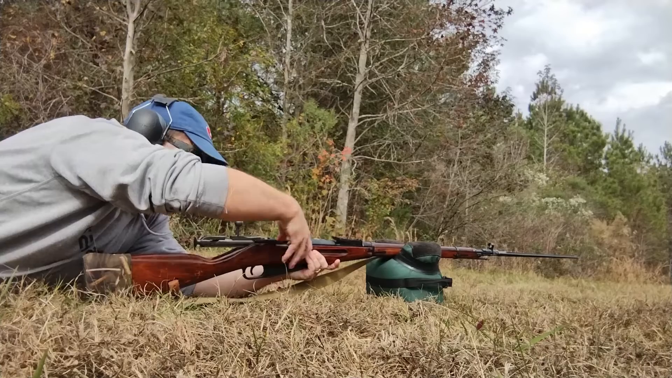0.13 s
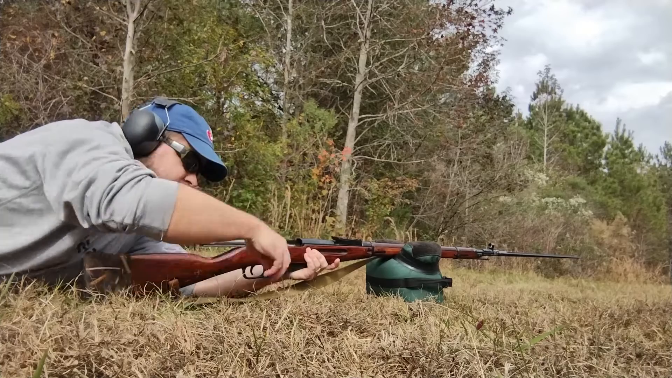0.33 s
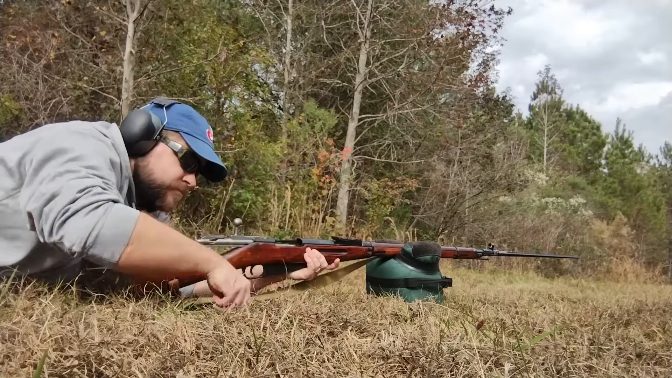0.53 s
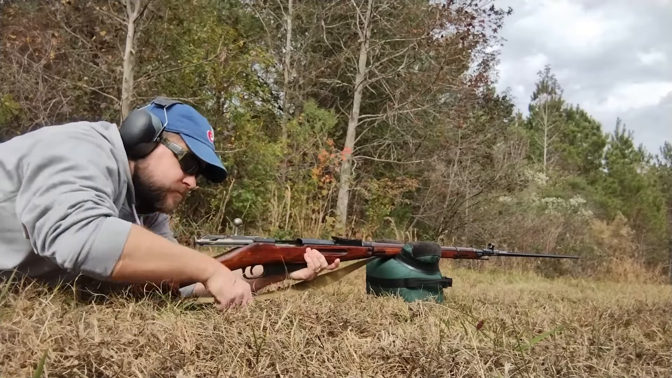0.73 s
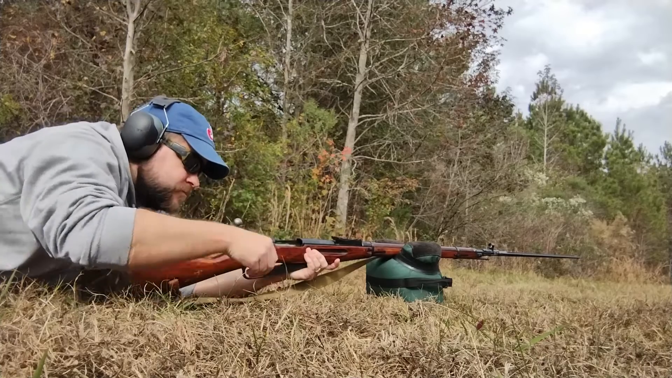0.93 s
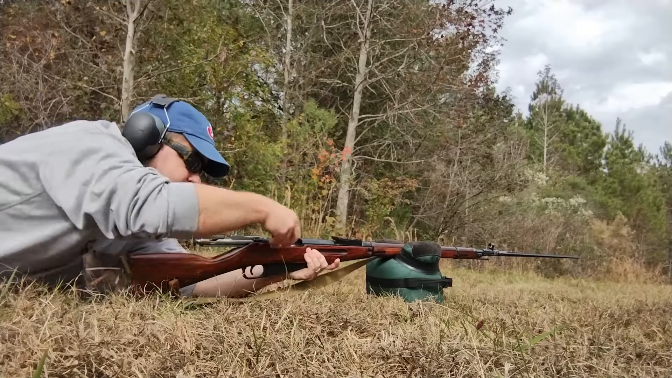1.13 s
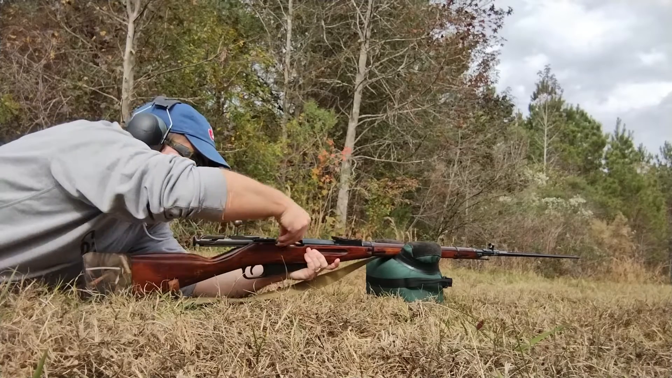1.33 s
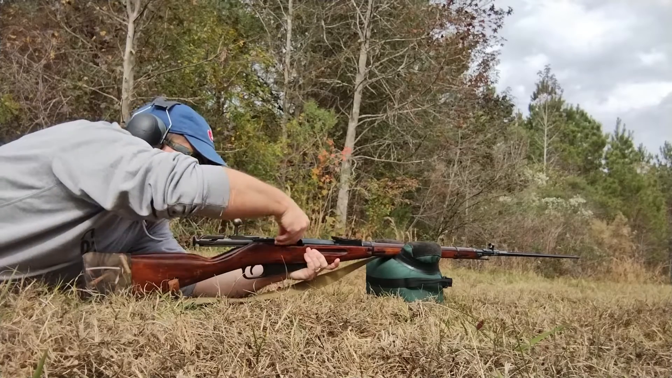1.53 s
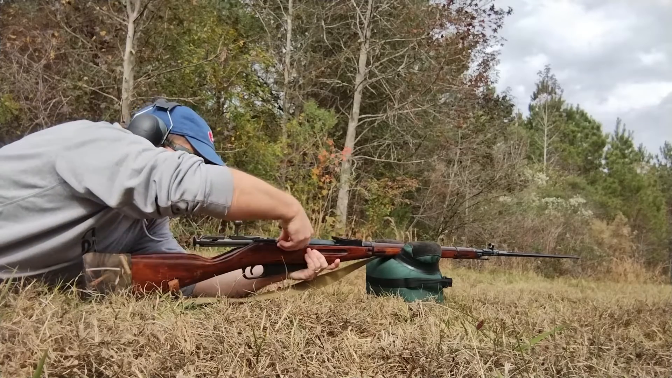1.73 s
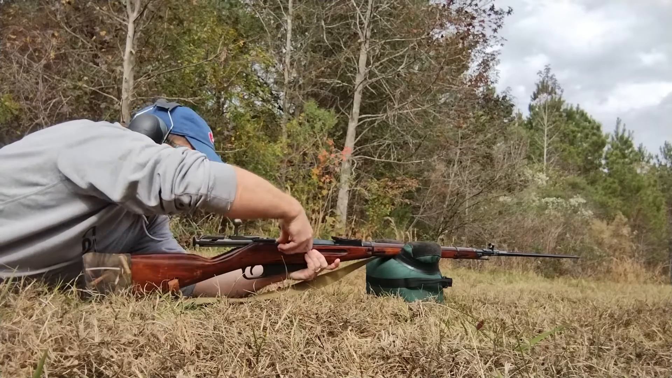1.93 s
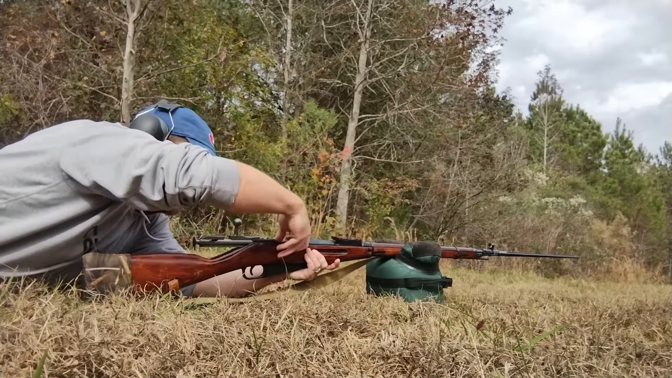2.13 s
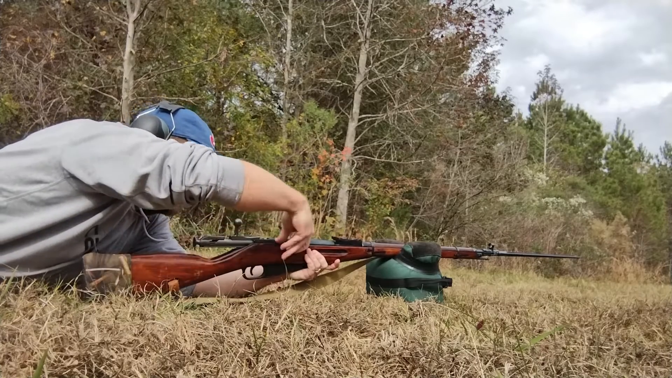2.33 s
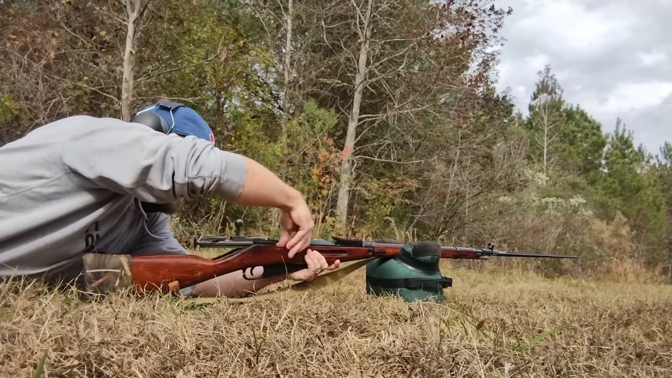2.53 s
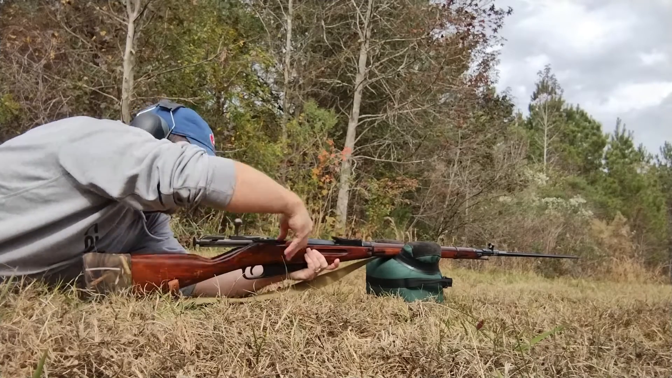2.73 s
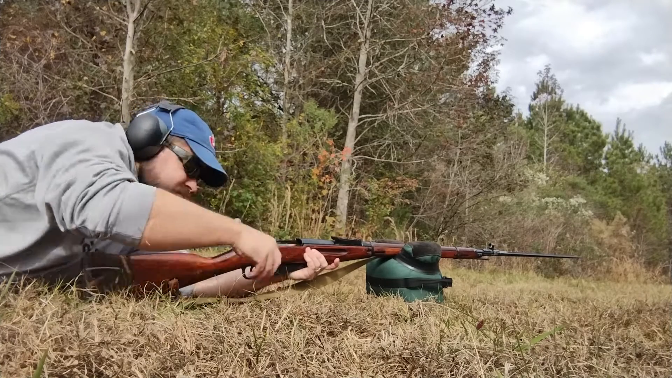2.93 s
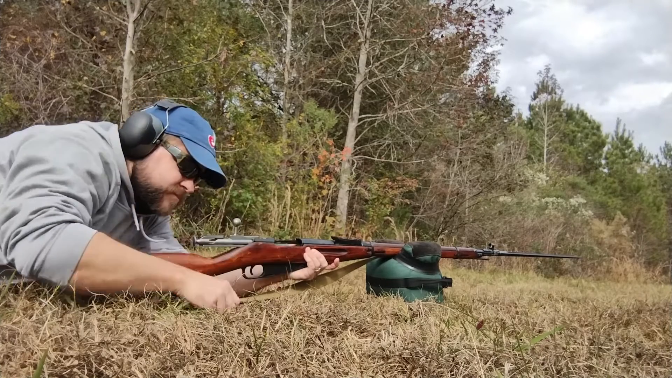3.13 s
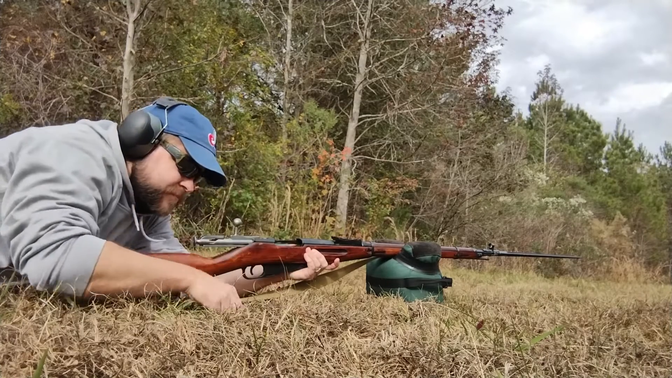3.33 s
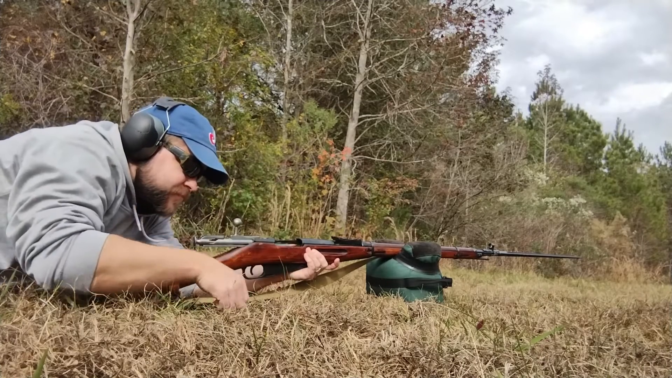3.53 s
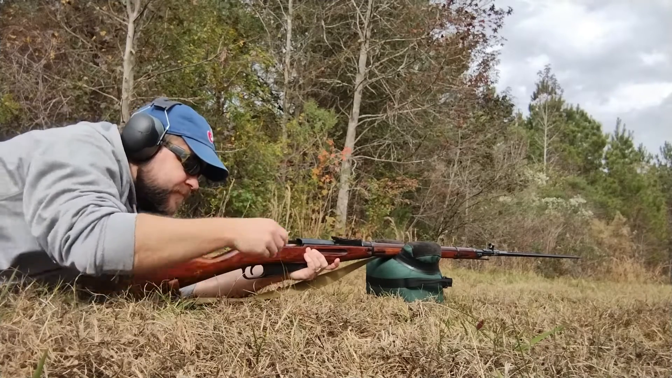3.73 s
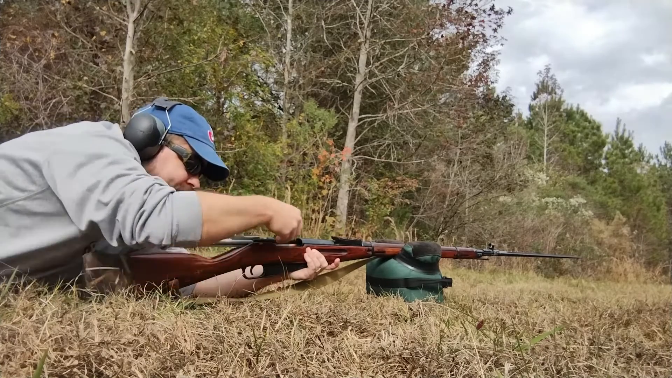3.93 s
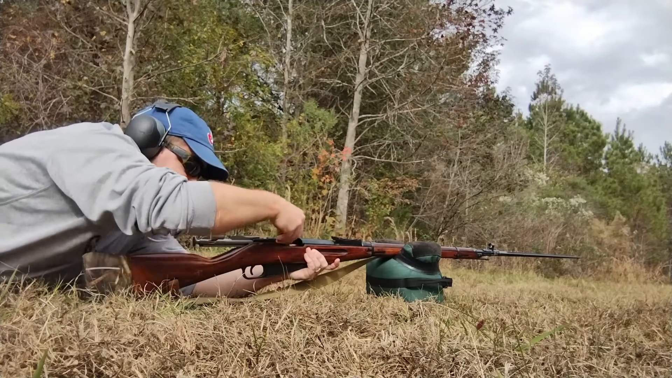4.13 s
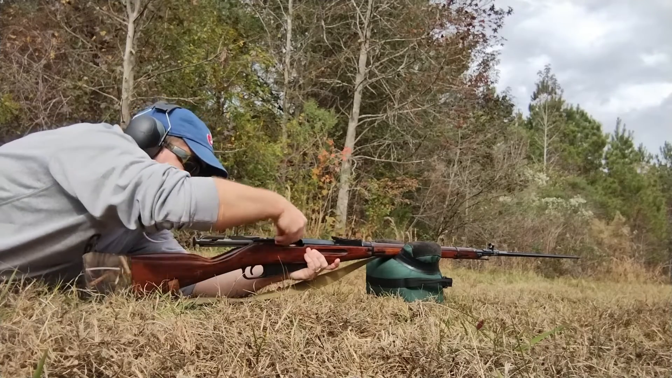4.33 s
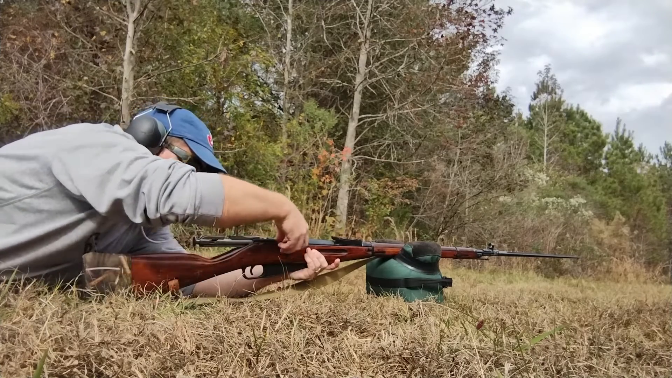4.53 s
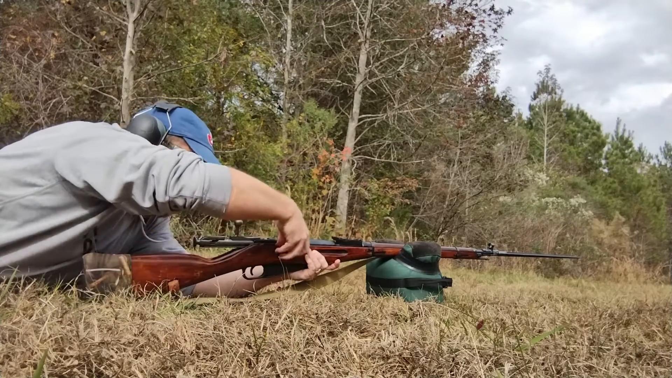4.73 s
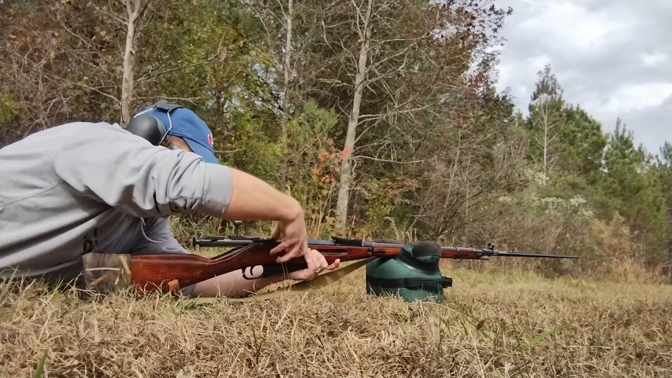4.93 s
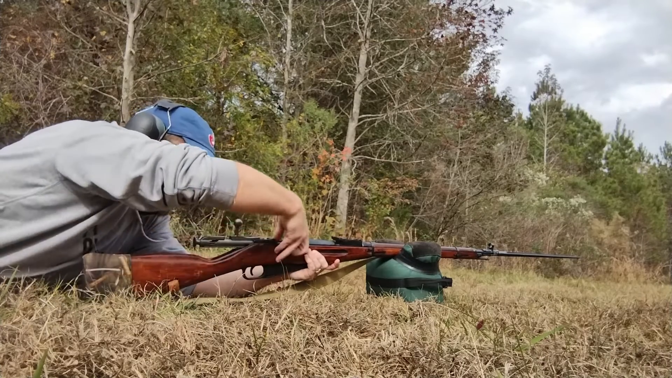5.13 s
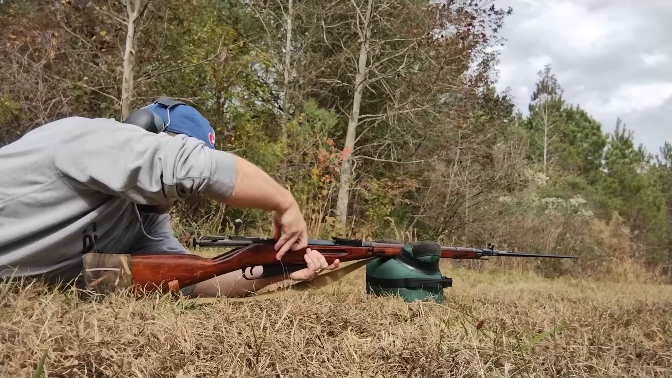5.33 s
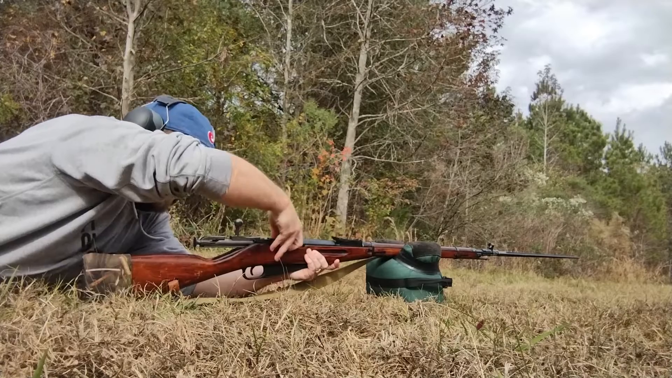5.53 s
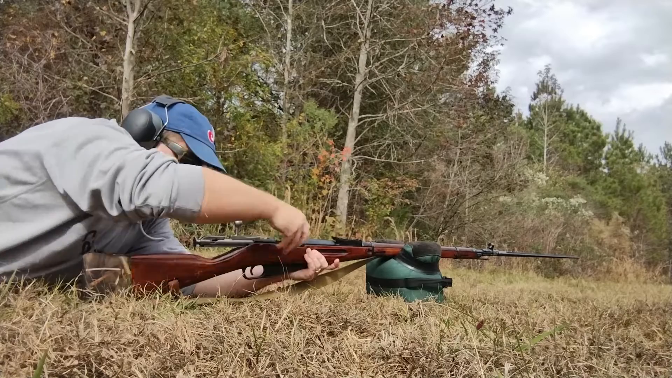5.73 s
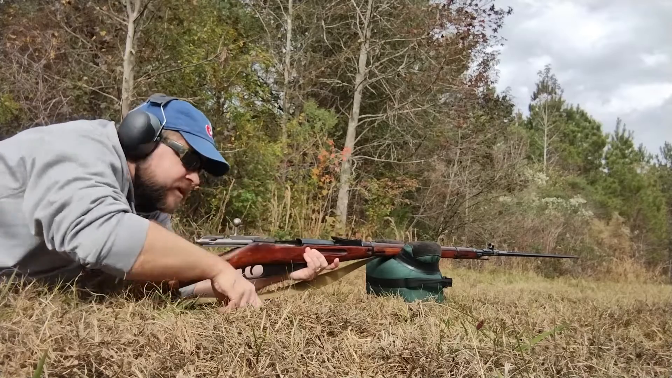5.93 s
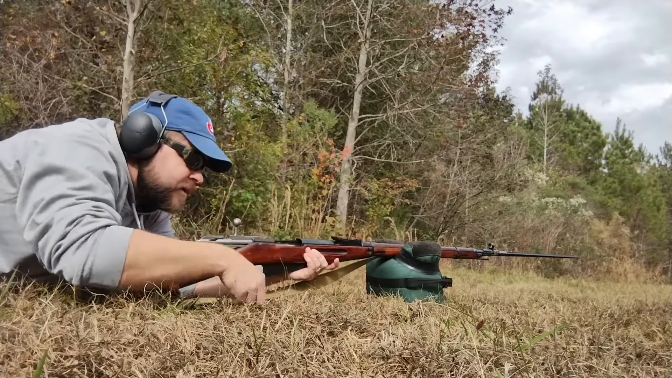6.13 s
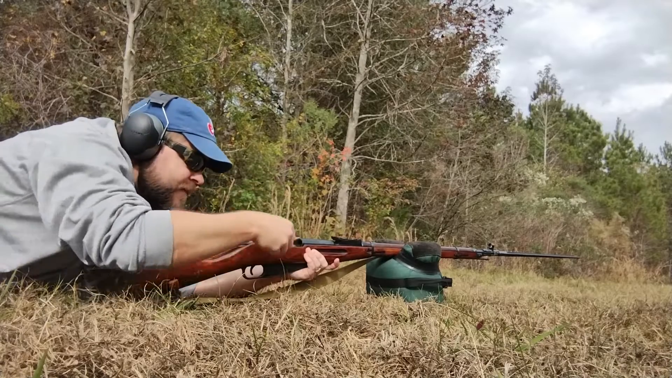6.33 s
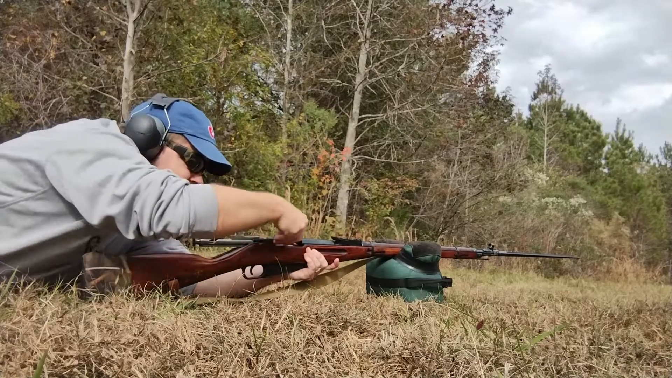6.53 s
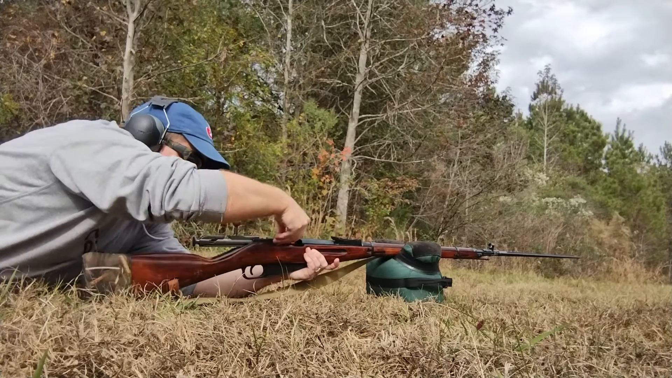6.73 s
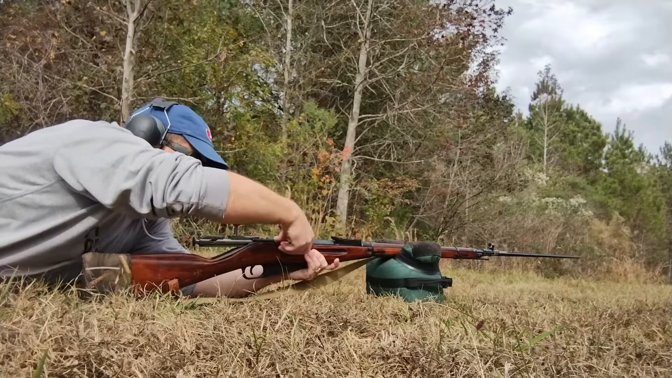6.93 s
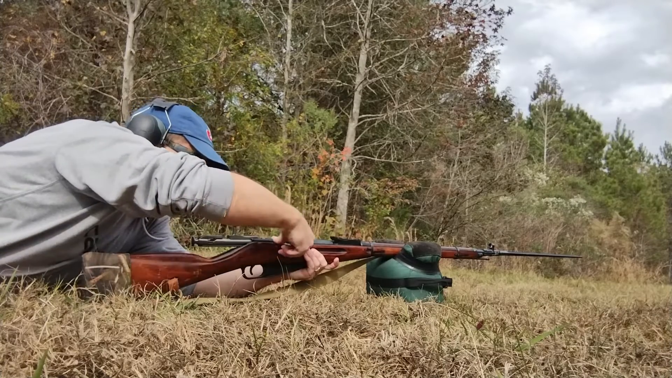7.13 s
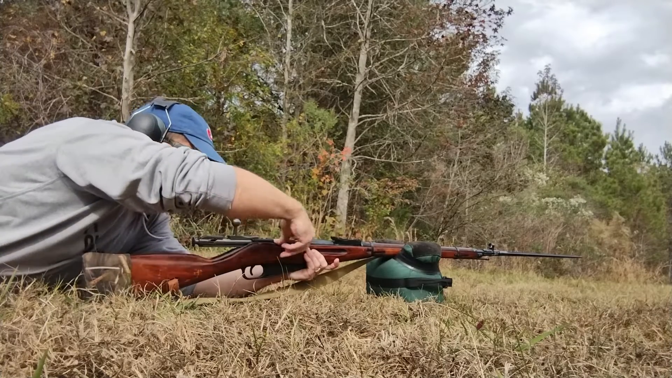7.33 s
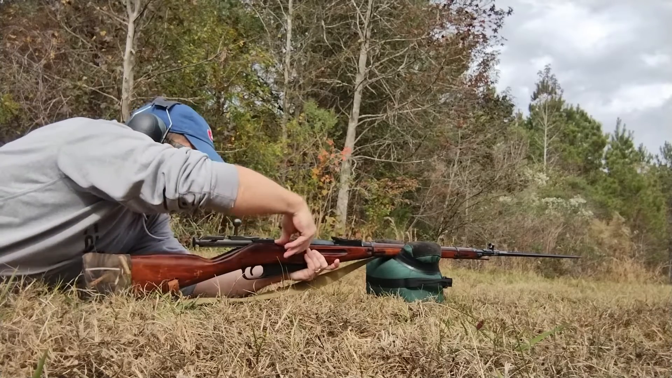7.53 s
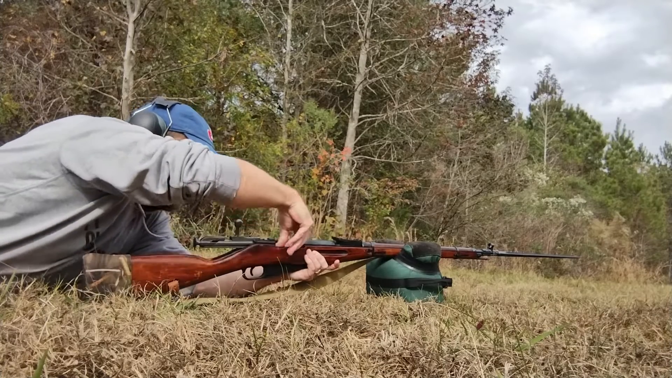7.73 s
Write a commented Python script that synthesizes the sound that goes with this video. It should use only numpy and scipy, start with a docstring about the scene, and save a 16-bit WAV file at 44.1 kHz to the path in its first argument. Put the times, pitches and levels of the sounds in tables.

```python
"""A rifle is loaded round by round in a grassy clearing, close to a small stereo camera microphone.
Cartridges and steel parts click, slide and rattle, ringing the action and knocking on the wooden stock;
a spring hums once. Brush and the tree line return a faint echo. Two insects tick fast in the treble on
the left, and a far engine drones on a few low orders over the rumble of the countryside."""
import sys
import numpy as np
from scipy import signal
from scipy.fft import rfft, irfft, next_fast_len
from scipy.io import wavfile
from scipy.ndimage import uniform_filter1d, map_coordinates

SR = 44100
rng = np.random.default_rng(int(sys.argv[2]) if len(sys.argv) > 2 else 0)


def unload_wav(signal):
    """Save mono or channel-first audio to the path in sys.argv[1] as 16-bit WAV at rate SR, clipped to [-1, 1]."""
    wavfile.write(
        sys.argv[1],
        SR,
        np.round(np.clip(np.atleast_2d(signal).T, -1, 1) * 32767).astype(np.int16),
    )


N = 347067


def amp(db):
    """Decibels to gain."""
    return 10 ** (np.asarray(db) / 20)


def unit(x):
    """Scaled to rms 1."""
    return x / np.sqrt(np.mean(x ** 2) + 1e-20)


def along(points, hz):
    """(Hz, value) points read on a log axis."""
    f, v = np.transpose(points)
    return np.interp(np.log(hz + 1), np.log(f + 1), v)


def wobble(rate):
    """A smooth random curve, rate knots a second."""
    return map_coordinates(rng.standard_normal(int(N * rate / SR) + 4), [np.arange(N) * rate / SR])


def filtered(x, response):
    """x times a complex response of frequency."""
    m = next_fast_len(x.shape[-1] + 2048)
    return irfft(rfft(x, m) * response(np.fft.rfftfreq(m, 1 / SR)), m)[..., :x.shape[-1]]


def even(x):
    """Levels the chance peaks and dips in a burst's spectrum."""
    z = rfft(x)
    power = np.abs(uniform_filter1d(np.abs(z) ** 2, size=51))
    return irfft(z / np.sqrt(power + 1e-20), x.shape[-1])


def spread(pair, alike, side):
    """Two unrelated signals mixed to left and right with a likeness and a balance by frequency."""
    turn = lambda hz: np.arccos(np.clip(along(alike, hz), -1, 1)) / 2
    mid, dif = filtered(pair, lambda hz: np.array([np.cos(turn(hz)), np.sin(turn(hz))]))
    return filtered(np.array([mid + dif, mid - dif]), lambda hz: amp(along(side, hz) * [[.5], [-.5]]))


def ringing(x, modes, scatter_db):
    """x through (centre, width, level) resonances at randomly scattered strengths, scaled to energy 1."""
    gains = amp(scatter_db * rng.standard_normal(len(modes)))
    y = filtered(x, lambda f: sum((-1) ** k * g * amp(db) * 1j * f * w / (c * c - f * f + 1j * f * w)
                                  for k, (g, (c, w, db)) in enumerate(zip(gains, modes))))
    return y / np.linalg.norm(y)


# Ambience of the clearing: f/Hz, relative level/dB
AIR_SPECTRUM = [(15, -62), (25, -28.5), (70, -6), (127, -5.5), (223, -12), (326, -17.5), (600, -22.5),
                (1370, -28.5), (4500, -30.5), (10100, -34.5)]
# The ambience across the two capsules: f/Hz, left-right likeness
AIR_ALIKE = [(30, .6), (100, 0.25), (300, 0.9), (640, .1), (1400, 0)]
def air():
    """Far countryside rumble, partly alike on both sides, over the unrelated hiss of the capsules."""
    noise = filtered(rng.standard_normal((2, N)), lambda hz: amp(along(AIR_SPECTRUM, hz)))
    return amp(-69) * unit(spread(noise, AIR_ALIKE, side=[(60, -1.5), (400, -0.12)]))


# Engine in the distance: t/s, low drone level/dB, top order level/dB
ENGINE_LEVELS = [(0, -72.5, -75.5), (1.1, -76.5, -88.5), (1.6, -71.5, -90), (2.3, -67.5, -71),
                 (3.3, -64, -68), (4.6, -64, -80.5), (5.5, -59.5, -73), (5.999, -63, -71), (6.55, -69, -93),
                 (7.1, -78.5, -70), (7.87, -72, -76)]
# Its low orders: multiples of the shaft rate
LOW_ORDERS = [2, 3, 4, 4.5]
# Each low order: level/dB at the mean drone level, factor on the drone's swell
ORDER_SWELL = [(-73, .2), (-68.5, 0.78), (-75.5, 0.74), (-86.5, 1.7)]
SHAFT_HZ, TOP_ORDER = 45.55, 6
def engine():
    """A far engine, a little to the right; the air makes each order waver in level and phase."""
    s, low_db, top_db = np.transpose(ENGINE_LEVELS)
    t = np.arange(N) / SR
    swell_db = np.interp(t, s, low_db - low_db.mean())
    levels = [db + factor * swell_db for db, factor in ORDER_SWELL] + [np.interp(t, s, top_db)]
    drone = np.zeros(N)
    for order, db in zip(LOW_ORDERS + [TOP_ORDER], levels):
        peak = np.sqrt(2) * amp(db + 1.2 * wobble(4.0))
        drone += peak * np.sin(2 * np.pi * order * SHAFT_HZ * t + .4 * wobble(0.41))
    return drone * amp([[-.6], [.6]])


# Wingbeats of the nearer and the farther insect: t/s, strokes so far
NEAR_STROKES = [(-.0073, 0), (3.028, 89), (4.02, 118), (5.721, 167), (6.59, 192)]
FAR_STROKES = [(-.0102, 0), (7.8789, 270)]
# Colour of the wings: f/Hz, relative level/dB
WING_SPECTRUM = [(9000, -51.5), (11500, -13.5), (13500, -4.5), (14500, 2), (15600, -4.5)]
def insect(strokes, tick_db, rasp_db, teeth, left_db):
    """An insect in the clearing: each wing stroke rasps over a row of teeth and peaks in a sharp tick."""
    s, count = np.transpose(strokes)
    phase = np.interp(np.arange(N) / SR, s, count + .5, left=-1, right=count[-1] + 1.2)
    stroke, off_centre = np.floor(phase).astype(int), phase % 1 - .5
    n_strokes = int(count[-1]) + 3
    strength = amp(2.508 * rng.standard_normal(n_strokes))[stroke]
    tick = amp(tick_db) * strength * np.exp(-(off_centre / 0.011) ** 2)
    tooth = amp(5 * rng.standard_normal(n_strokes * teeth))[np.floor(phase * teeth).astype(int)]
    scrape = tooth * np.sin(np.pi * teeth * phase) ** 4 * np.cos(np.pi * off_centre) ** 2
    rasp = amp(rasp_db) * (.5 + scrape)
    singing = (phase >= 0) & (phase < count[-1] + 1)
    noise = unit(filtered(rng.standard_normal((2, N)), lambda hz: amp(along(WING_SPECTRUM, hz))))
    return singing * (tick + rasp) * noise * amp([[left_db / 2], [-left_db / 2]])


# Echo from the far tree line: f/Hz, t60/s
TREE_DECAY = [(800, .6), (4000, .62), (12000, .45)]
BRUSH_DB, BRUSH_T60_S = 7, .13  # near grass and brush answer first, over the far trees
def trees(x):
    """Trunks and brush scatter the sound back, pitch blurred, each frequency dying at its own speed."""
    blurred = x * unit(wobble(3500))
    hz, t, noise = signal.stft(rng.standard_normal((2, SR // 2)), SR, nperseg=256)
    decay = amp(-60 * t / along(TREE_DECAY, hz)[:, None]) + amp(BRUSH_DB - 60 * t / BRUSH_T60_S)
    tail = signal.istft(noise * decay, SR, nperseg=256)[1]
    delayed = np.pad(blurred, ((0, 0), (400, 0)))
    return signal.fftconvolve(delayed, tail / np.linalg.norm(tail[0]), axes=1)[:, :N]


def spring(start_s, length_s, hz, db):
    """A spring in the rifle hums once on a steady pitch, fades a little and is damped."""
    progress = (np.arange(N) / SR - start_s) / length_s
    gate = np.clip(np.minimum(progress / .1, (1 - progress) / 0.21), 0, 1)
    fade = amp(-9 * np.clip(progress, 0, 1))
    return amp(db) * np.sqrt(2) * gate * fade * np.sin(2 * np.pi * hz * length_s * progress)


# Pushes that reach the hollow of the stock: t/s, level/dB
THUDS = [(0.011, -39.5), (2.06, -50), (2.127, -48), (2.257, -47.5), (2.488, -42), (2.606, -27),
         (2.627, -30), (2.798, -38), (4.29, -46.5), (4.412, -43.5), (4.76, -40), (5.241, -42.5),
         (5.471, -43), (5.482, -44.5), (6.8, -49), (6.906, -50), (7.048, -47.5), (7.197, -46),
         (7.809, -30.5)]
# Magazine well in the stock: f/Hz, width/Hz, level/dB
HOLLOW_MODES = [(376, 98, -3.5), (541.5, 66, 1.5), (666, 170, 4)]
def thuds():
    """Soft pushes sound the hollow of the stock."""
    out, t = np.zeros((2, N + SR)), np.arange(SR // 10) / SR
    push = (1 - np.exp(-t / 0.00033)) * amp(-60 * t / .02)
    for s, db in THUDS:
        hollow = ringing(push * rng.standard_normal((2, len(t))), HOLLOW_MODES, scatter_db=1.5)
        start = round(s * SR)
        out[:, start:start + len(t)] += amp(db) * np.linalg.norm(push) * hollow
    return out[:, :N]


def hardness(db):
    """Near 0 for the lightest touch, up to 1 for the hardest blow."""
    return min(np.sqrt(amp(db)), 1)


# Steel action, rung by slides and contacts alike: f/Hz, width/Hz, level/dB
STEEL_MODES = [(2720, 590, -10), (3140, 900, -5.5), (3800, 500, -4), (4620, 750, 0), (4800, 370, -11.5),
               (6600, 120, -7), (6520, 680, -7.5), (7850, 1200, -7)]
CRUNCH_BAND = (5050, 1300, -6.5)  # many weak steel modes blur into one wide band
# Wooden stock: f/Hz, width/Hz, level/dB
WOOD_MODES = [(700, 300, -11.5), (1068, 250, -7), (1263, 180, -2.5), (1450, 220, -6.5), (2100, 1100, -17)]
# Snap of the small parts: f/Hz, width/Hz, level/dB
SNAP_MODES = [(10200, 1800, -4), (12800, 1300, 0), (15000, 1500, -15)]
# Parts sliding against each other, and loose parts rattling after the heaviest blows: t/s, length/s, level/dB
SLIDES = [(0.2, 0.12, -65), (1.357, 0.11, -64.5), (1.496, 0.047, -69.5), (2.236, 0.14, -63.5),
          (1.984, 0.052, -60), (2.465, 0.061, -46.5), (2.592, 0.089, -34), (4.183, 0.21, -60.5),
          (4.747, 0.079, -35), (4.94, 0.19, -55.5), (5.446, 0.05, -55.5), (5.177, 0.1, -63),
          (5.849, 0.4, -77), (6.73, 0.12, -62), (7.109, 0.18, -70.5), (7.263, 0.084, -65),
          (7.418, 0.093, -69), (7.782, 0.068, -36)]
RATTLE_DB, RATTLE_LEAD_S, RATTLE_S, HARD_RATTLE_S = -38, .012, 0.034, .055
def slides():
    """Rubbing steel catches and slips in uneven grains; loose parts rattle around every contact."""
    out = np.zeros((2, N + SR))
    catches = np.pad(amp(4.5 * wobble(300)), (0, SR), constant_values=1)
    # hard blows rattle earlier and longer
    rattles = [(s - RATTLE_LEAD_S * hardness(db), RATTLE_S + (HARD_RATTLE_S - RATTLE_S) * hardness(db),
                db + RATTLE_DB) for s, db, *_ in CONTACTS]
    for s, length, db in SLIDES + rattles:
        start, n = max(round(s * SR), 0), round(length * SR)
        stroke = np.linspace(0, 1, n) ** .8 * np.linspace(1, 0, n) ** 2.4  # builds quickly, eases off
        grains = stroke * unit(catches[start:start + n]) * rng.standard_normal((2, n))
        grains = np.pad(grains, ((0, 0), (0, 800)))  # room to ring out
        sound = ringing(grains, STEEL_MODES + [CRUNCH_BAND], scatter_db=5.5)
        sound += amp(-8.5) * ringing(grains, WOOD_MODES, scatter_db=4.0)
        sound += amp(-19.5) * ringing(grains, SNAP_MODES, scatter_db=2.5)
        out[:, start:start + n + 800] += amp(db) * np.sqrt(n) * sound
    return out[:, :N]


LEAD_S, GRAZE_DB = .006, -18  # the faces graze before they meet
GRAZE_S, HARD_GRAZE_S, GRAIN_T60_S, HARD_GRAIN_T60_S = .0006, .003, 0.013, 0.021  # at hardness 0 and 1
RING_WIDTH_HZ, BRASS_RING_DB, HARD_RING_DB = 260, 3.5, 4  # brass and hard blows ring more purely
KNOCK_DB, SNAP_DB, CLINK_DB = -18, -14, -8  # stock, small parts and brass under the steel
# Cartridge cases: f/Hz, width/Hz, level/dB; light touches that ring near the first mode are on brass
BRASS_MODES, BRASS_NEAR_HZ = [(6450, 35, -6), (7450, 76, -5)], 350
# Clicks and clacks at the microphone: t/s, level/dB, ring f/Hz, brightness/dB (more snap, less knock)
CONTACTS = [(0.0089, -10, 4890, 6.5), (0.0197, -21.5, 4600, 0.5), (0.0266, -32.5, 5800, 4),
            (0.0458, -20, 4500, 4.5), (0.0582, -22.5, 6850, 7), (0.229, -35.5, 8000, 17),
            (0.2368, -26, 6280, 2.5), (0.257, -42, 4090, 10), (1.35, -39.5, 3980, -16.5),
            (1.359, -37, 2960, -21.5), (1.366, -42, 3930, -19), (1.428, -27, 6260, 6.5),
            (1.437, -42, 6500, 9), (1.4697, -35.5, 6200, -1.5), (1.573, -27.5, 4270, 4.5),
            (1.6, -49, 2900, -14), (1.6426, -31.5, 4400, 2), (1.649, -41, 6300, 7), (1.658, -25.5, 6200, 5),
            (1.677, -52, 6560, 14), (1.802, -45.5, 4870, -3), (2.001, -34.5, 3820, 4),
            (2.0407, -39.5, 4700, -5), (2.0588, -34.5, 6700, -3), (2.065, -38, 6900, 4),
            (2.1264, -34, 3750, -6), (2.2374, -35, 4520, 2.5), (2.2505, -37, 6360, 1),
            (2.2574, -33, 6570, 0), (2.281, -46, 4160, -4), (2.2994, -38.5, 3800, -6),
            (2.4401, -31, 4760, 3), (2.4721, -21, 3950, 5.5), (2.4878, -22, 4350, 6.5),
            (2.605, -5.5, 6500, 11), (2.6077, -2, 3950, 2.5), (2.6209, -3.5, 4150, 9),
            (2.628, -17.5, 4100, 0.5), (2.6336, -17.5, 3580, -2.5), (2.77, -46.5, 3300, -11),
            (2.779, -48, 3500, -13), (2.791, -25.5, 4410, -2.5), (2.7986, -23, 4760, 2),
            (4.1812, -33, 6330, 7.5), (4.195, -39, 6560, 3), (4.2437, -30, 6440, 0),
            (4.2712, -30.5, 3290, -13), (4.289, -24, 4220, 3.5), (4.4109, -20, 6670, 4.5),
            (4.5061, -30.5, 7000, 1), (4.522, -35.5, 5500, 11), (4.535, -22, 4410, -3),
            (4.6083, -36, 4340, -7), (4.757, -11.5, 7150, -3.5), (4.764, -20.5, 4540, -13),
            (4.773, -14, 4620, 2), (4.7812, -15.5, 4220, -5), (4.788, -16, 4940, 4),
            (4.895, -35, 3220, -11.5), (4.962, -22.5, 4440, -6.5), (4.968, -17.5, 4850, 1),
            (4.975, -16, 4840, -4.5), (4.9868, -11.5, 4600, 3), (4.992, -23, 4450, -4),
            (5.008, -39, 3300, 10), (5.0227, -28, 4700, -1), (5.0309, -30, 4450, 8),
            (5.047, -39.5, 3500, 11), (5.055, -43, 3470, -19), (5.1062, -34.5, 4330, 1),
            (5.178, -31.5, 4230, 1), (5.1959, -18, 4190, 6.5), (5.2133, -28, 4820, -16.5),
            (5.239, -20, 4320, 2.5), (5.4684, -27.5, 4570, -16), (5.4797, -4.5, 4660, -1),
            (5.4947, -28, 4700, -6.5), (5.5553, -43, 3310, -9.5), (5.627, -53, 3000, -13),
            (5.7403, -42, 3170, -4.5), (5.915, -53.5, 2930, -15), (6.653, -38, 6430, 14.5),
            (6.7337, -37.5, 4560, 2), (6.751, -32.5, 6630, 5), (6.767, -41, 6830, 9),
            (6.778, -31.5, 6300, 2), (6.885, -34, 6630, -3), (6.9054, -26.5, 6360, -2),
            (6.9908, -53.5, 3570, -8), (7.0228, -47, 4440, -7), (7.0464, -33, 3630, 1),
            (7.063, -34.5, 4000, -2), (7.1934, -28, 7300, 0), (7.4441, -47, 3206, -18),
            (7.479, -43, 3014, -10.5), (7.7881, -9.5, 4030, 10), (7.796, -12, 4570, 0),
            (7.8086, -15, 4620, 5.5), (7.821, -26, 3540, 1)]
def contacts():
    """Each contact is a short grainy burst that rings steel, stock, small parts and cartridge brass."""
    out, t = np.zeros((2, N + SR)), np.arange(SR // 10) / SR - LEAD_S
    after = np.clip(t, 0, None)
    for s, db, hz, bright_db in CONTACTS:
        hard = hardness(db)
        graze = amp(GRAZE_DB) * np.exp(-np.abs(t) / (GRAZE_S + (HARD_GRAZE_S - GRAZE_S) * hard))
        t60 = GRAIN_T60_S + (HARD_GRAIN_T60_S - GRAIN_T60_S) * hard
        shape = graze + (1 - np.exp(-after / 0.00098)) * amp(-60 * after / t60)
        grains = shape * rng.standard_normal((2, 2, len(t))) * amp(3.5 * rng.standard_normal(len(t)))
        burst, strike = even(grains) * np.minimum(6 * shape, 1) ** .6
        on_brass = np.exp(-((hz - BRASS_MODES[0][0]) / BRASS_NEAR_HZ) ** 2) * (0.5 - hard)
        steel = ringing(burst, STEEL_MODES + [CRUNCH_BAND], scatter_db=2.1)
        ring = ringing(strike, [(hz, RING_WIDTH_HZ, 0)], scatter_db=0)  # nearest the point of contact
        steel += amp(BRASS_RING_DB * on_brass + HARD_RING_DB * hard) * ring
        knock = amp(KNOCK_DB - bright_db) * ringing(burst, WOOD_MODES, scatter_db=2.0)
        snap = amp(SNAP_DB + bright_db) * ringing(burst, SNAP_MODES, scatter_db=0)
        clink = on_brass * amp(CLINK_DB) * ringing(strike, BRASS_MODES, scatter_db=1.5)
        sound = steel / np.linalg.norm(steel) + knock + snap + clink
        start = round((s - LEAD_S) * SR)
        out[:, start:start + len(t)] += amp(db) * np.linalg.norm(shape) * sound
    return out[:, :N]


# The rifle across the two capsules: f/Hz, left-right likeness
RIFLE_ALIKE = [(400, .8), (2500, .75), (5000, .55), (9000, .25), (13000, .05)]
# Its balance: f/Hz, left over right level/dB
RIFLE_SIDE = [(500, -0.5), (4000, 1.5), (13000, 3.5)]
def rifle():
    """Blows and slides close by and a little left, from parts too small to radiate bass."""
    handling = contacts() + thuds() + slides()
    radiated = filtered(handling, lambda hz: hz ** 2 / (hz ** 2 + 330 ** 2))
    return spread(radiated, RIFLE_ALIKE, RIFLE_SIDE)


def scene():
    """The clearing from the microphone: the rifle up close, its echo, two insects, engine and air."""
    gun = rifle() + spring(start_s=5.488, length_s=.062, hz=960, db=-60)
    echo = amp(-28.5) * trees(gun)
    near_insect = insect(NEAR_STROKES, tick_db=-66.5, rasp_db=-74.5, teeth=5, left_db=8.0)
    far_insect = insect(FAR_STROKES, tick_db=-78, rasp_db=-84, teeth=3, left_db=2)
    return gun + echo + engine() + air() + near_insect + far_insect


CEILING, TOP_HZ = .82, 15950
def record(dry):
    """The camera's input stage rounds off the loudest peaks and keeps nothing above its band limit."""
    rounded = dry / (1 + np.abs(dry / CEILING) ** 6) ** (1 / 6)
    return filtered(rounded, lambda hz: np.clip((TOP_HZ - hz) / 250, 0, 1) ** 2)


dry = scene()
out = record(dry)
unload_wav(out)
```